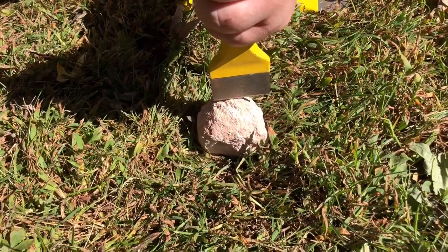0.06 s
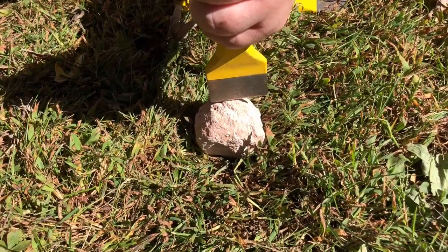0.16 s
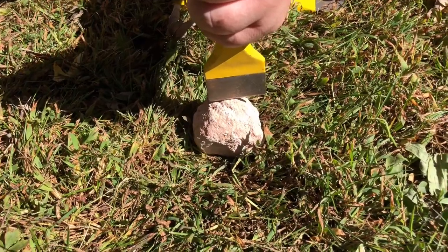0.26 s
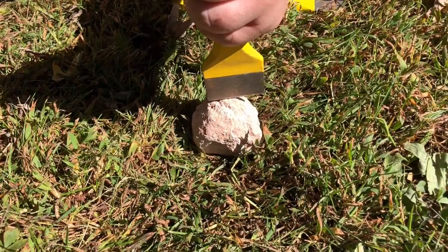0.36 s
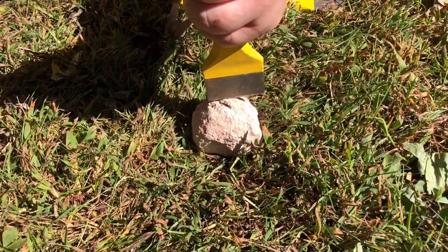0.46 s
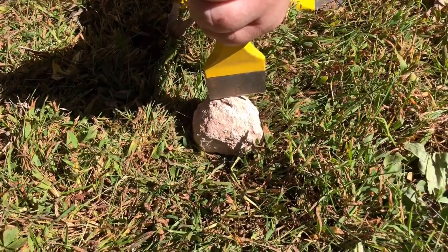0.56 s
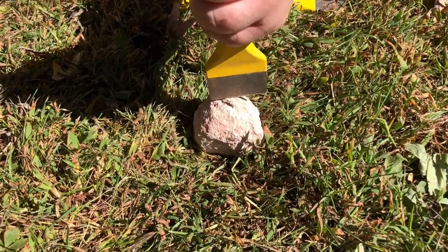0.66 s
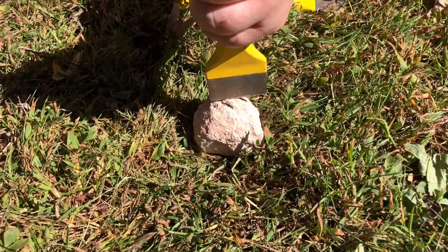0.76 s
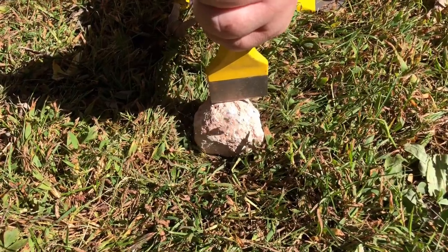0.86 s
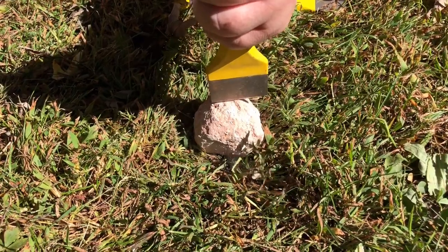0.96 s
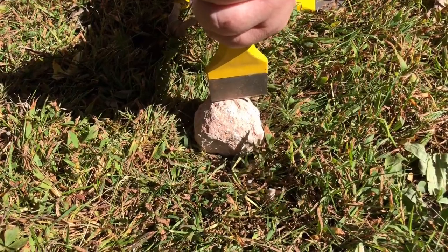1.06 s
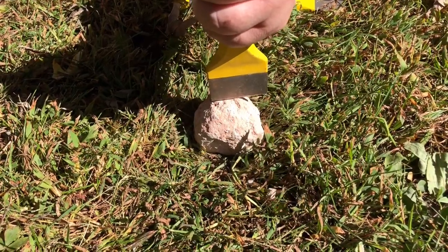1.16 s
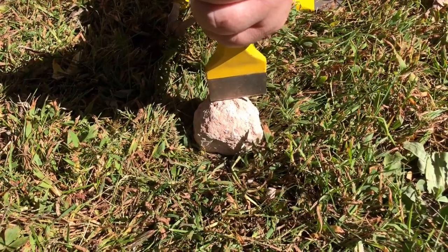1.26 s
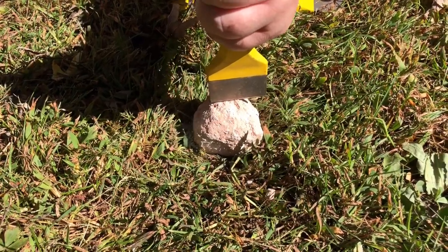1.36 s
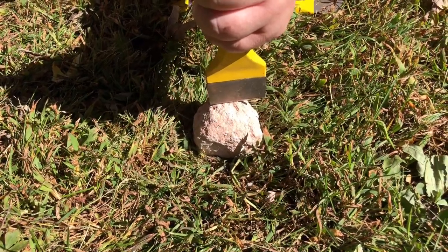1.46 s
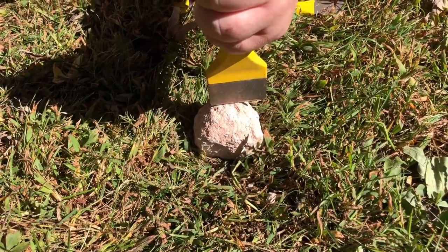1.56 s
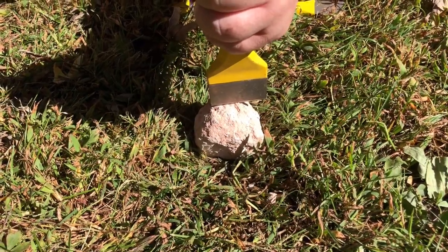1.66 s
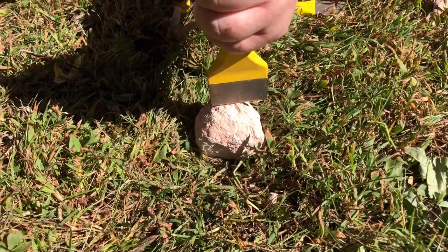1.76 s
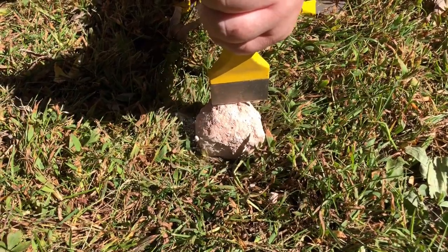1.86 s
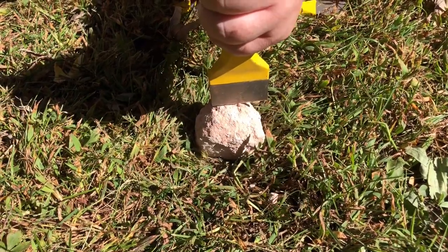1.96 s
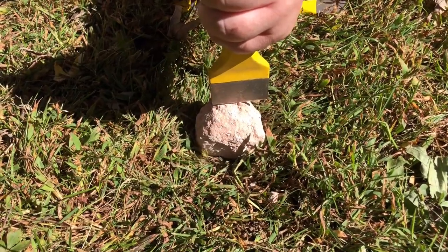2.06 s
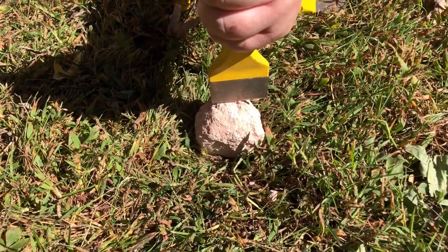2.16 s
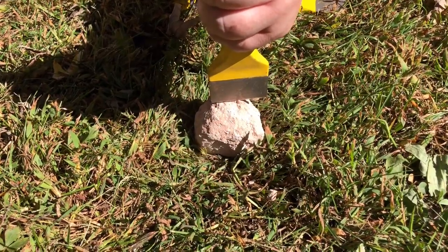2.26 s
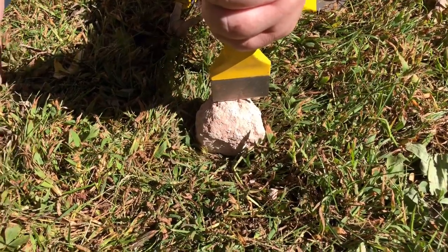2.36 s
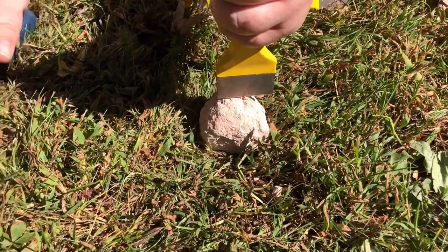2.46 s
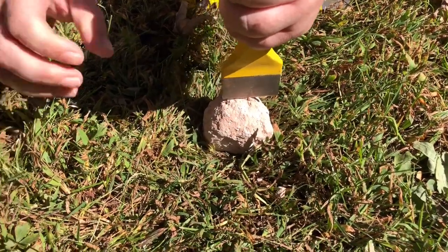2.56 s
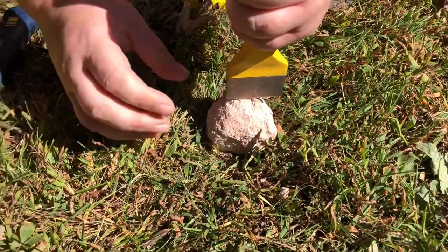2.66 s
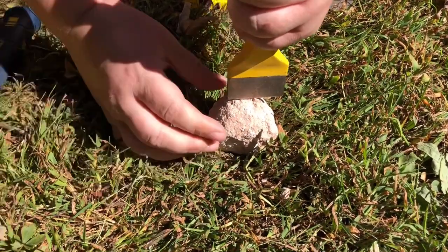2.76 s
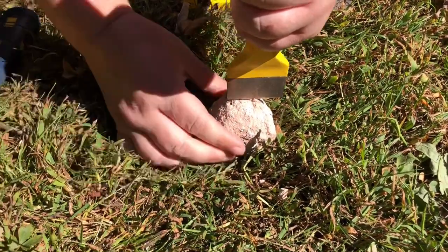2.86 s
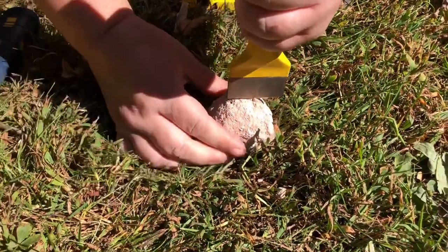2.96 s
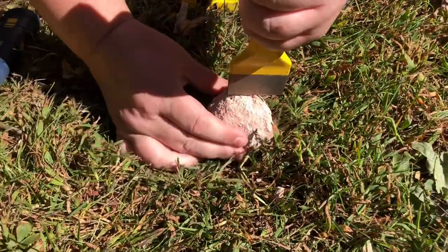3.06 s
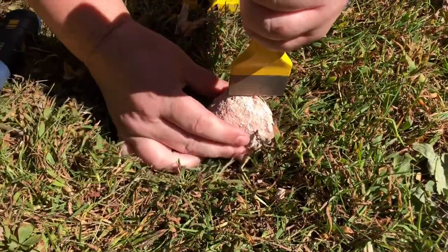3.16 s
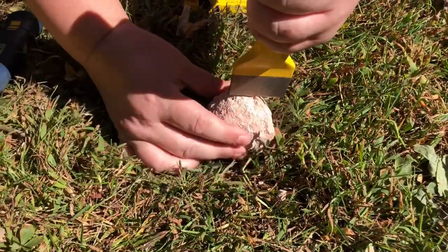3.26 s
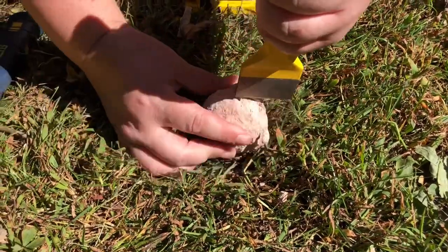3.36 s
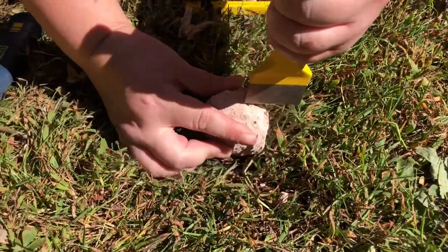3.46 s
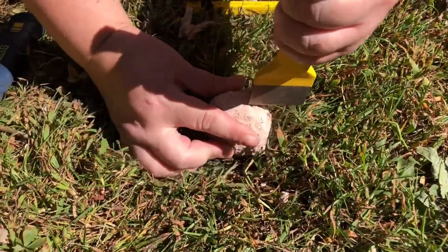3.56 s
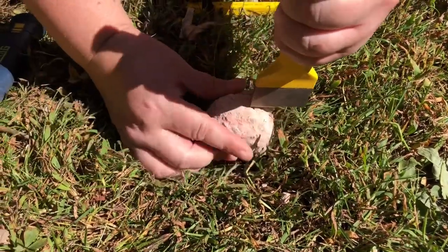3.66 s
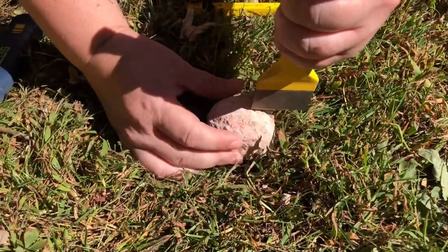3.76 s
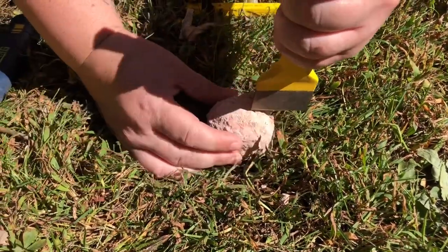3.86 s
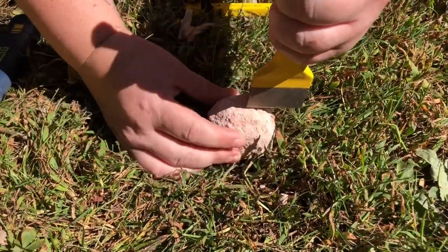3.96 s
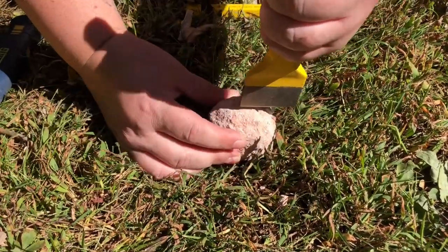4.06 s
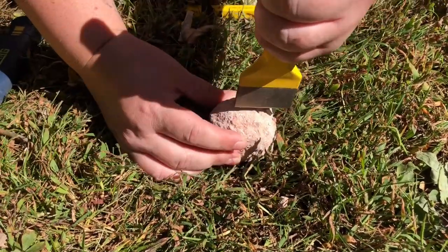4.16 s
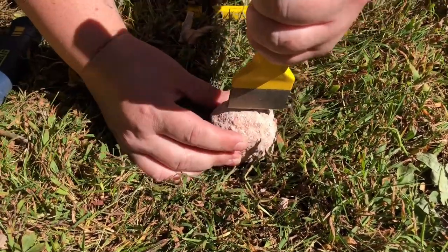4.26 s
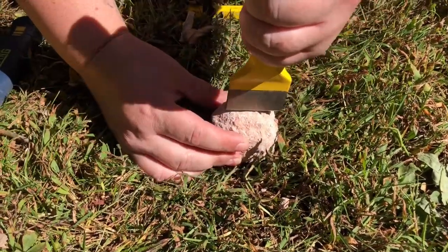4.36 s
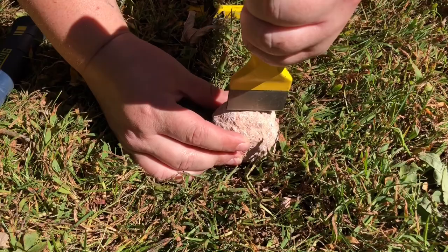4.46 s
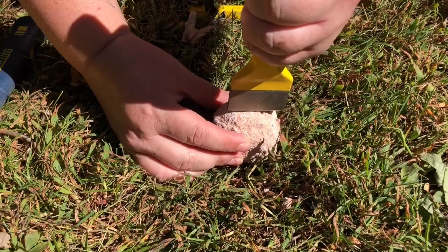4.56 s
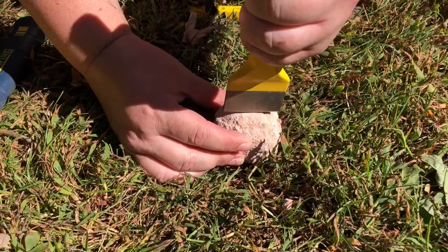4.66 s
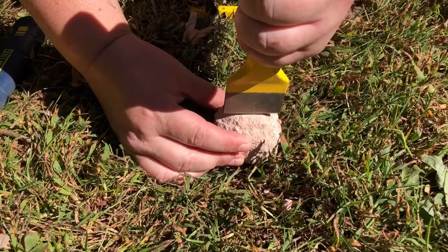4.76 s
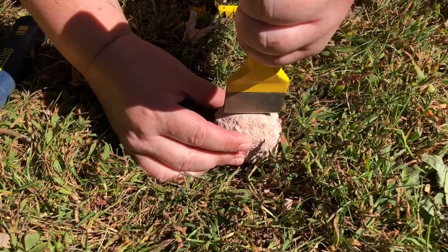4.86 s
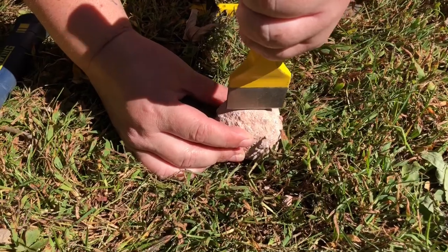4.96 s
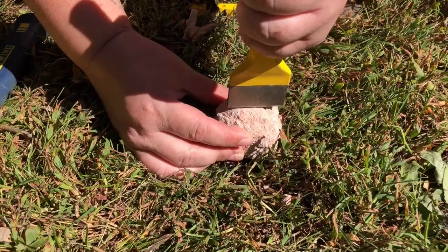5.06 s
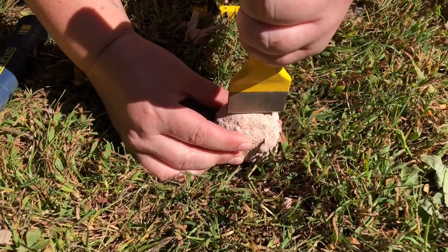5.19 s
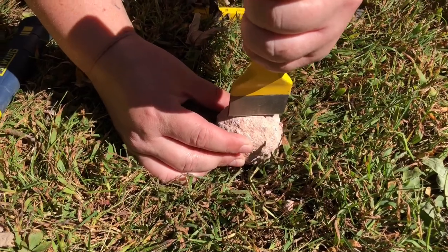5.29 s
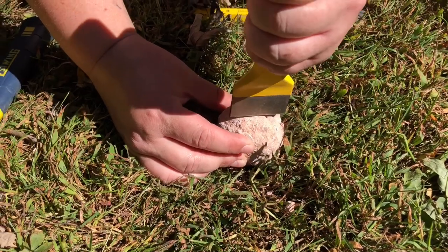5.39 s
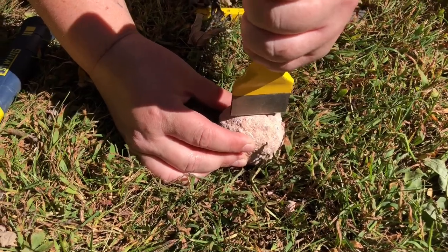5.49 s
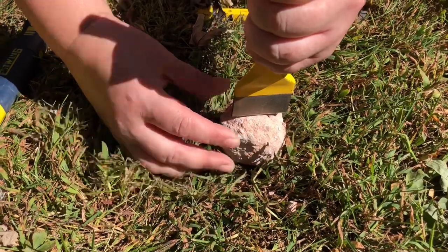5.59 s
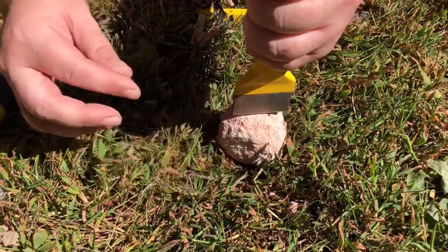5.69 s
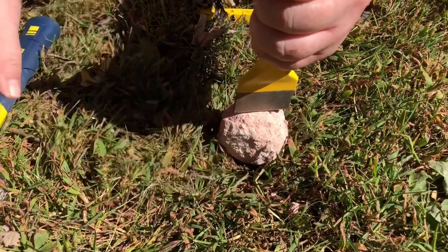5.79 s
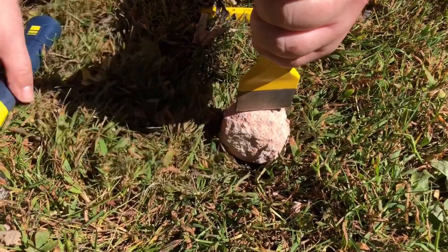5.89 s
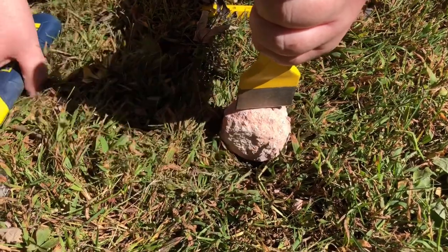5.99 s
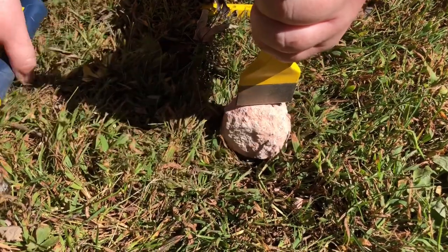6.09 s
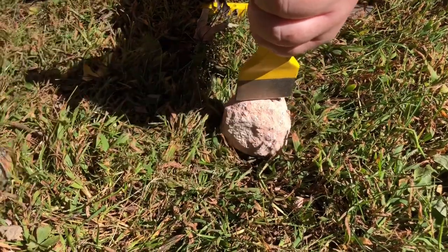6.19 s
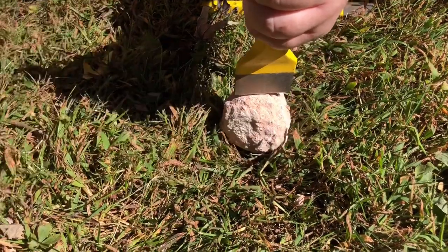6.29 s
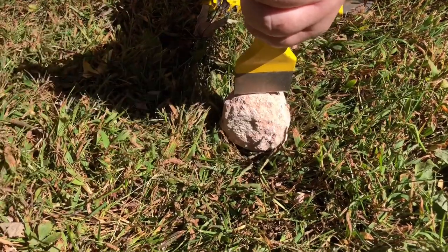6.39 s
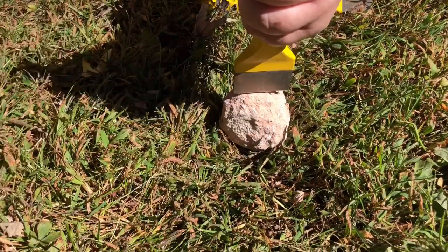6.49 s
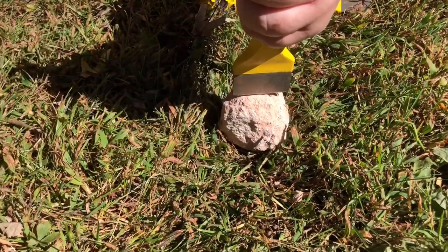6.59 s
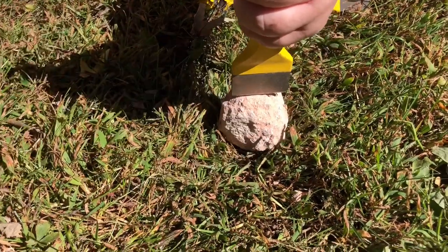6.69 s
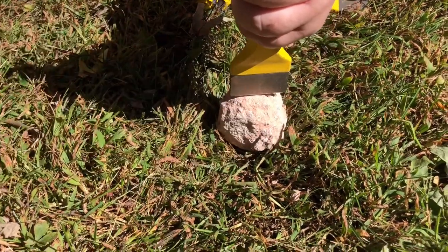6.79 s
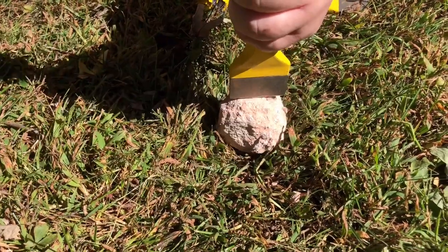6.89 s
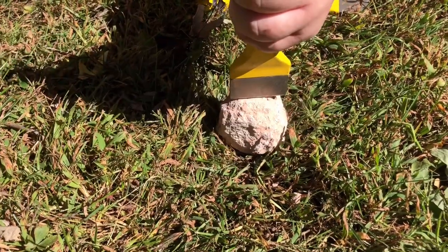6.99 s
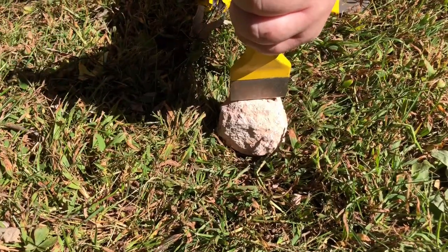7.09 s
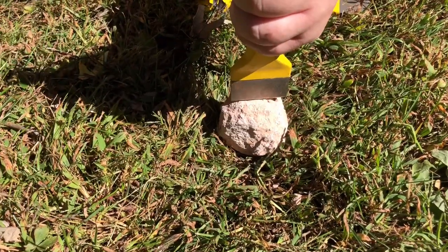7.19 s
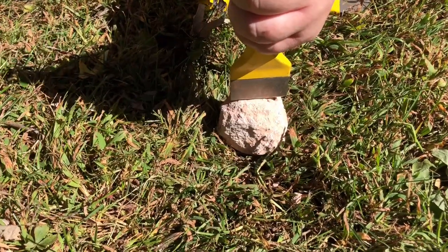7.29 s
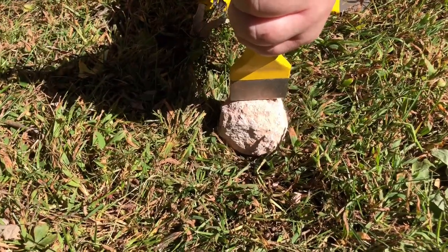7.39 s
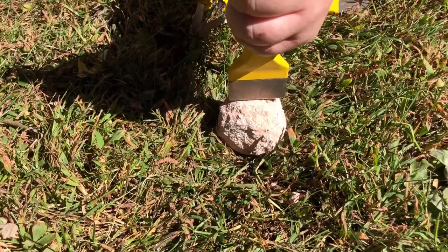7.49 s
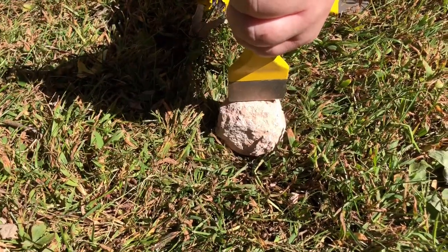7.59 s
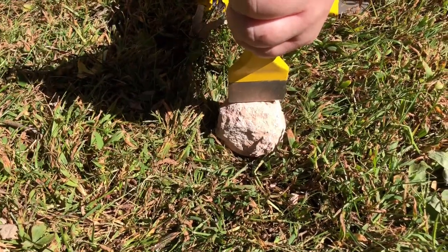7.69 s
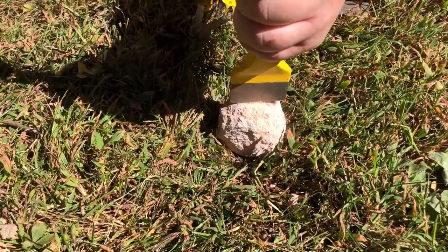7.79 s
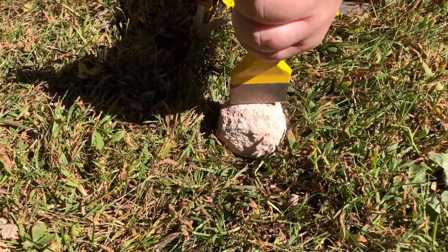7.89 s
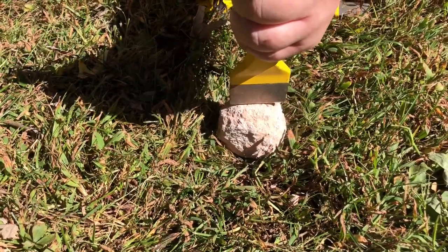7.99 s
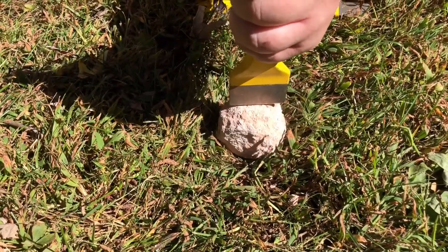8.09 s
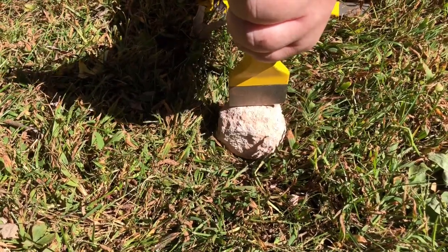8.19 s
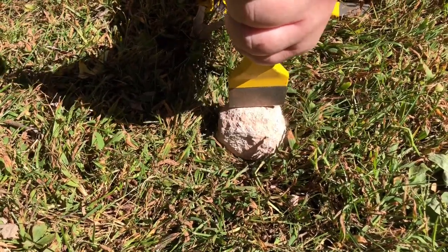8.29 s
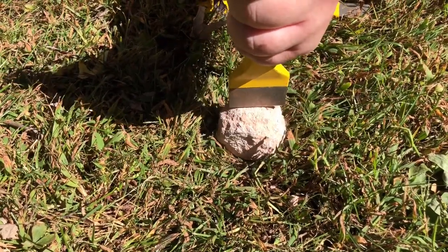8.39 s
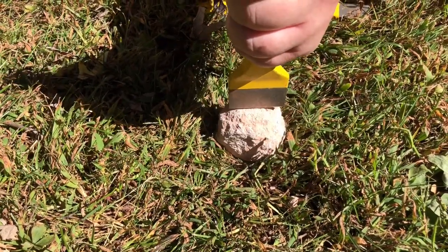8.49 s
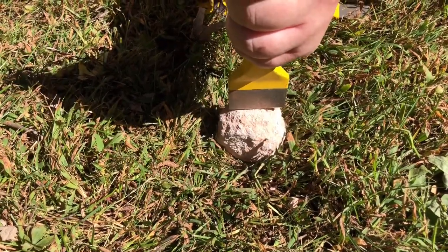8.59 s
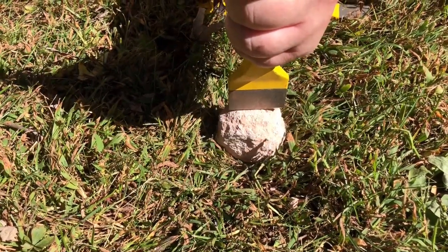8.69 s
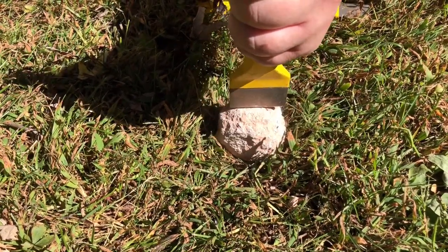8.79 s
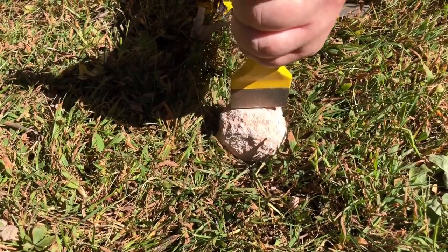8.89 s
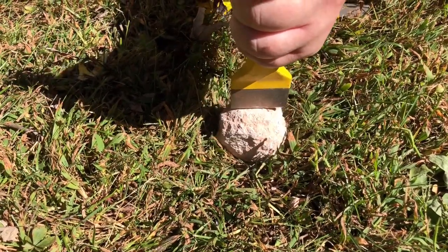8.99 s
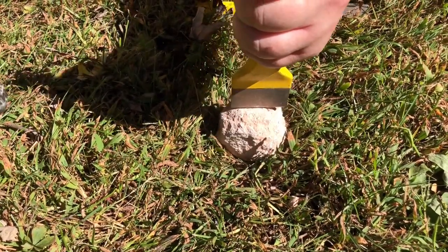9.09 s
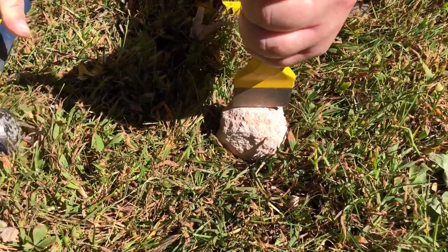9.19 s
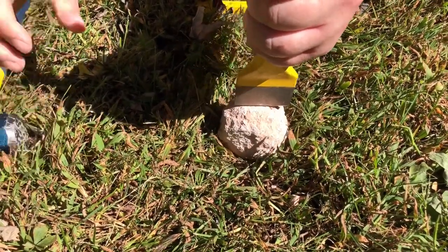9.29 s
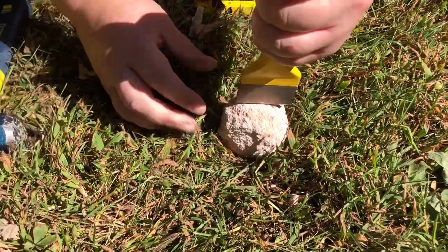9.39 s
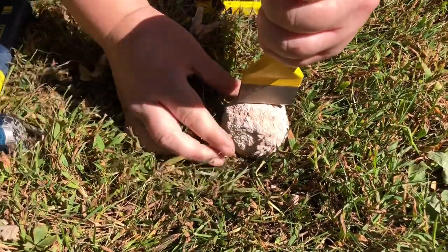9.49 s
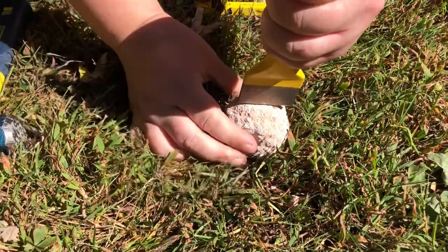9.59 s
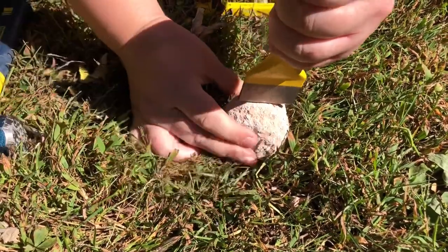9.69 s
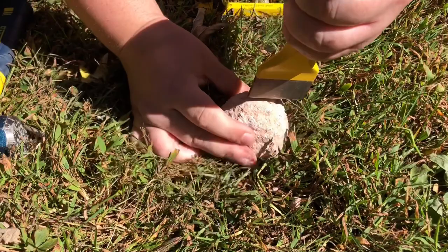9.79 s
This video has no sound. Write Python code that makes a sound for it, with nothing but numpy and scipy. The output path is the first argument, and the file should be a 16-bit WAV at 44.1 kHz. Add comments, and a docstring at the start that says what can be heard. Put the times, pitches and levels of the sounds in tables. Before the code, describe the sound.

A mallet hits a chisel on a stone in two runs of five sharp, ringing cracks, outdoors in a light breeze.

```python
"""A sharp crack, a thin steel ring, a thud of turf: a mallet drives a wide chisel against a geode
on a lawn, two runs of five blows. Between runs the stone is reset: the blade clinks on it, grit
snaps, clothing rustles. At the end the mallet drops on the grass. A nearby wall answers each blow.
Underneath: light breeze, far engine, high hiss. A limiter ducks briefly on the cracks."""
import sys
import numpy as np
from scipy import signal
from scipy.fft import rfft, irfft, next_fast_len
from scipy.io import wavfile
from scipy.ndimage import uniform_filter1d, minimum_filter1d

SR = 44100
rng = np.random.default_rng(int(sys.argv[2]) if len(sys.argv) > 2 else 0)


def digitize_waveform(pressure):
    """Quantize a signal to 16-bit integers and store it at the path in sys.argv[1].

    Rows of a 2-D input are taken as channels; values are limited to [-1, 1].
    """
    field = np.atleast_2d(pressure).T
    bounded = np.clip(field, -1, 1)
    quanta = np.round(bounded * 32767).astype(np.int16)
    wavfile.write(sys.argv[1], SR, quanta)


N = 434374
TIME_S = np.arange(N) / SR
EVENT_S = np.arange(int(.3 * SR)) / SR   # time axis of one impact

# breeze on the microphone: t/s, level/dB
BREEZE_LEVEL = [(0, -45.5), (.85, -48.5), (1.75, -52.5), (3.15, -48.5), (3.75, -51), (4.6, -48), (6.7, -48),
                (7.35, -45), (7.65, -50.5), (8.26, -53.5), (9.85, -48)]
# airy rush and high hiss together: t/s, level/dB
DISTANT_LEVEL = [(0, -59), (.8, -58.5), (1.7, -63), (3.05, -60), (7.35, -58), (7.6, -60), (8.26, -64),
                 (8.55, -62.5), (9.2, -64), (9.5, -59.5)]
# noise spectra: f/Hz, relative density/dB
BREEZE_SPECTRUM = [(20, -41), (40, -15), (65, -2.5), (100, 0), (135, -0.5), (200, -8.5), (320, -15),
                   (500, -21.5), (900, -50), (3000, -77.5)]
AIR_SPECTRUM = [(100, -11), (500, -0.5), (1200, 0.5), (2300, -2.5), (4000, -6), (7000, -5.5), (10000, -20),
                (15500, -20)]
HISS_SPECTRUM = [(4500, -39.5), (5650, -13.5), (6000, 6), (6700, 7), (7400, 1.5), (8000, 0.5), (8700, -15),
                 (10500, -33)]
CLOTH_SPECTRUM = [(400, 2.5), (1500, -2), (4000, 3), (7000, -1.5), (10000, 4.5), (13000, 4.5), (15700, 4.5)]
ECHO_SPECTRUM = [(100, 6), (900, -3), (1400, 0.5), (1850, 6), (2300, 1), (3000, 4.5), (4300, -4.5),
                 (5000, 2), (5400, 2), (5900, -4), (7000, -6), (10300, -2.5), (12500, -12), (15000, -1)]
# far engine, revving up twice: t/s, f/Hz, level/dB
ENGINE_TRACK = [(0, 97, -54), (1.4, 134.3, -60.5), (3.1, 133.2, -61), (3.7, 119.9, -67),
                (4.899, 112.3, -51.5), (5.599, 82.03, -58.5), (6.3, 93, -50.5), (7.4, 127.1, -47.5),
                (8.3, 113.9, -62.5), (9.2, 94, -57), (9.85, 112.8, -47.5)]
# wall echo and tail: delay/s, relative level/dB
ECHO_ENVELOPE = [(.006, -16), (.02, -7.5), (.04, -17.5), (.042, -0.5), (.046, -4), (.049, -0.5),
                 (.056, -9.5), (.09, -13.5), (.13, -19), (.22, -30), (.45, -50)]
# clothing rubs as the arm moves: t/s, length/s, start level/dB, swell/dB
CLOTH_SWISHES = [(2.424, 0.03, -47.5, 3.5), (2.474, 0.14, -50, -6.5), (2.87, 0.36, -62, -10),
                 (3.467, .07, -62.5, 5), (5.734, .18, -57, -3.5), (6.022, .42, -55, 5.5),
                 (9.284, 0.011, -44, -1.5), (9.366, .015, -49.5, 0), (9.488, .02, -61, -2),
                 (9.565, .1, -58, 1.5), (9.699, .15, -63, -4)]
# loose blade skids on the stone: t/s, level/dB, contact/s
BLADE_SKIDS = [(3.214, -62.5, 0.0038), (3.504, -38.5, 0.06), (4.07, -56, .03), (4.747, -39.5, 0.044),
               (5.157, -38.5, 0.019), (6.039, -49, .06)]
# grit snaps under the edge: t/s, level/dB, f/Hz
GRIT_SNAPS = [(1.279, -33.5, 4740), (3.214, -37.5, 4500), (4.0186, -40, 2900), (4.753, -37, 3020),
              (5.16, -34, 3020), (7.225, -51.5, 11060), (9.773, -34.5, 4260), (9.842, -41, 3900)]
# mallet lands on the grass: t/s, level/dB
MALLET_DROPS = [(9.307, -20), (9.386, -24)]
# modes: f/Hz, level/dB, t60/s
LOOSE_BLADE_MODES = [(1855, -6, 0.044), (3746, 1.5, 0.06), (3960, -11, 0.022), (7080, -3, .04),
                     (8800, -14.5, 0.053), (11560, -9.5, 0.029), (12640, -29, 0.11), (13900, -12.5, .05)]
BITING_BLADE_MODES = [(5320, -2.5, 0.017), (5413, 3, 0.013), (5560, -5.5, .015), (7290, -6, 0.014),
                      (10140, -9, 0.012), (11700, -16.5, 0.0061)]   # edge held in the stone
SHANK_MODES = [(12770, 0, .016), (12677, -17, .09), (14680, -10, .015), (14574, -31, .1)]   # main ring, then overtone; each a brief and a lasting mode
TURF_MODES = [(87, -10.5, 0.097), (175.9, -24, 0.071), (383, -34.5, 0.096), (445.5, -32.5, 0.12)]   # bounce on the lawn
GEODE_MODES = [(970, -23.5, 0.019), (1510, -14.5, 0.014), (2680, -8.5, 0.01), (3125, -6, 0.0093),
               (3440, -13, 0.0045), (3910, -3.5, 0.0072), (4450, -7.5, 0.018)]
# crack of the stone: f/Hz, density/dB, t60/s
CRACK_SPECTRUM = [(150, -28.5, .035), (410, -15.5, 0.034), (620, -30, 0.02), (900, -0.5, 0.023),
                  (1220, -6, 0.023), (1570, -4, .018), (2740, -0.5, 0.018), (4500, 1, 0.012),
                  (6200, 3.5, 0.0088), (7440, -13, 0.019), (8700, -22, 0.014), (11700, -1, 0.0065),
                  (15500, -22, 0.018)]
# faint ticks ahead of each crack: lead/s, relative level/dB
PRE_TICKS = [(.0232, -46.5), (.012, -54)]
# mallet blows: t/s, crack/dB, rebound delay/s, rebound/dB, knock/dB, knock centre/Hz,
# blade/dB, shank/dB, shank overtone/dB, thud/dB
MALLET_BLOWS = [(0.043, -0.5, 0.0018, -4, 2.5, 4700, 5, 10.5, -11, -7.5),
                (0.5056, 1.5, 0.0037, -1, -1.5, 4700, 4.5, 4.5, -4.5, 0),
                (0.9765, 0.5, 0.0043, -4.5, 3, 4400, 5.5, 9, -14.5, -0.5),
                (1.4421, 0.5, 0.0034, -9, 12.5, 4280, 0, -3.5, 2.5, -2.5),
                (1.922, 1, 0.0038, -6.5, 15, 3900, 2, 1, -1.5, 0),
                (7.0556, -0.5, 0.0022, -3.5, 12.5, 3900, 3.5, 4, -1.5, -15),
                (7.4858, -1.5, .0035, -9, 12.5, 2790, 0.5, 5.5, -10, -3.5),
                (7.9436, -1.5, 0.003, -5.5, 1.5, 2690, 0.5, 5.5, -13.5, -3.5),
                (8.3935, -0.5, 0.002, -4.5, 7, 3097, -7.5, 10.5, 11, -0.5),
                (8.8369, -2.5, 0.0012, -5.5, 15.5, 3510, 1.5, -3, 2, 3)]


def from_db(db):
    """Decibels to gain."""
    return 10 ** (np.asarray(db) / 20)


def unit_rms(x):
    """Scale to rms 1."""
    return x / np.sqrt(np.mean(x ** 2) + 1e-20)


def at_hz(rows, hz, column=1):
    """Table column, interpolated over log frequency."""
    rows = np.array(rows)
    return np.interp(np.log(np.maximum(hz, 1)), np.log(rows[:, 0]), rows[:, column])


def gain_curve(rows, column=1):
    """Gain over time from a dB column."""
    rows = np.array(rows)
    return from_db(np.interp(TIME_S, rows[:, 0], rows[:, column]))


def noise(spectrum, size=N):
    """Coloured noise, rms 1."""
    n = next_fast_len(size)
    colour = from_db(at_hz(spectrum, np.arange(n // 2 + 1) * SR / n))
    return unit_rms(irfft(rfft(rng.standard_normal(n)) * colour, n)[:size])


def drift(rate_hz):
    """Random wander, rms 1."""
    knots = rng.standard_normal(int(N / SR * rate_hz) + 2)
    return unit_rms(np.interp(TIME_S * rate_hz, np.arange(len(knots)), knots))


def bandpass(x, low_hz, high_hz):
    """Butterworth band-pass."""
    sos = signal.butter(2, [low_hz, min(high_hz, .45 * SR)], "band", fs=SR, output="sos")
    return signal.sosfilt(sos, x)


def decay(t60_s):
    """Envelope, down 60 dB at t60_s."""
    return from_db(-60 * EVENT_S / t60_s)


def burst(t60_s, low_hz, high_hz):
    """Decaying noise in one band."""
    return bandpass(rng.standard_normal(len(EVENT_S)) * decay(t60_s), low_hz, high_hz)


def ring(modes, spread_db=0, detune=0):
    """Struck modes; level and pitch vary with the contact point."""
    return sum(from_db(db + spread_db * rng.normal()) * decay(t60_s)
               * np.sin(2 * np.pi * hz * (1 + detune * rng.normal()) * EVENT_S)
               for hz, db, t60_s in modes)


def add(out, start_s, sound):
    """Mix a sound in at start_s."""
    i = max(0, round(start_s * SR))
    out[i:i + len(sound)] += sound[:max(0, len(out) - i)]


def breeze(gain_db=.5, gust_db=1):
    """Lumpy wind rumble on the microphone."""
    return from_db(gain_db + gust_db * drift(22)) * gain_curve(BREEZE_LEVEL) * noise(BREEZE_SPECTRUM)


def distant_hiss(air_db=2.5):
    """Airy rush and a high hiss as of far insects."""
    return gain_curve(DISTANT_LEVEL) * (from_db(air_db) * noise(AIR_SPECTRUM) + noise(HISS_SPECTRUM))


def far_whine(level_db=-71, fade_start_s=3.8, fade_db_per_s=29.5):
    """Faint narrow-band tone that dies away."""
    fade_db = fade_db_per_s * np.maximum(TIME_S - fade_start_s, 0)
    return from_db(level_db - fade_db) * unit_rms(bandpass(rng.standard_normal(N), 1300, 1328))


def far_engine(waver=0.01568, fade_db=3, harmonics_db=(0, -6, -18)):
    """Three low harmonics, each fading in and out through moving air."""
    times_s, hz, _ = np.transpose(ENGINE_TRACK)
    pitch_hz = np.interp(TIME_S, times_s, hz) * (1 + waver * drift(12))
    phase = 2 * np.pi * np.cumsum(pitch_hz) / SR
    hum = sum(from_db(db + fade_db * drift(9)) * np.sin(k * phase)
              for k, db in enumerate(harmonics_db, 1))
    return gain_curve(ENGINE_TRACK, column=2) * hum


def wall_echo(x, wet_db=-39):
    """Scattered reflection off the wall, then a short thin tail."""
    size = SR // 2
    arrived = TIME_S[:size] > ECHO_ENVELOPE[0][0]
    response = noise(ECHO_SPECTRUM, size) * gain_curve(ECHO_ENVELOPE)[:size] * arrived
    return from_db(wet_db) * signal.fftconvolve(x, response / np.linalg.norm(response))[:N]


def clothing(gain_db=3, uneven_db=2, grain_db=1.5, crackle_db=2, rise_db_per_s=600, fall_db_per_s=330):
    """Sliding fabric: bright uneven swishes with a fine crackle of fibres."""
    motion = 0
    for start_s, length_s, db, swell_db in CLOTH_SWISHES:
        age_s = TIME_S - start_s
        hold_db = db + swell_db * np.clip(age_s / length_s, 0, 1)
        fade_db = rise_db_per_s * np.maximum(-age_s, 0) + fall_db_per_s * np.maximum(age_s - length_s, 0)
        motion = np.maximum(motion, from_db(hold_db - fade_db))
    texture_db = uneven_db * drift(30) + grain_db * drift(150) + crackle_db * drift(2000)
    return from_db(gain_db + texture_db) * motion * noise(CLOTH_SPECTRUM)


def blade_clinks():
    """Skids on the stone drive the loose blade's bending modes."""
    out = np.zeros(N)
    for start_s, db, contact_s in BLADE_SKIDS:
        skid = rng.standard_normal(len(EVENT_S)) * np.exp(-(EVENT_S / contact_s) ** 4)
        clink = signal.fftconvolve(skid / np.linalg.norm(skid), ring(LOOSE_BLADE_MODES, spread_db=4))
        add(out, start_s, from_db(db) * clink)
    return out


def grit(t60_s=0.019, band_ratio=1.9):
    """Grains snap under the edge."""
    out = np.zeros(N)
    for start_s, db, hz in GRIT_SNAPS:
        add(out, start_s, from_db(db) * burst(t60_s, hz / band_ratio, hz * band_ratio))
    return out


def mallet_drop():
    """The dropped mallet thuds twice on the turf."""
    out = np.zeros(N)
    for start_s, db in MALLET_DROPS:
        add(out, start_s, from_db(db) * ring(TURF_MODES))
    return out


def stone_crack():
    """Stone crushed under the edge: a burst whose treble dies first."""
    out, edges_hz = 0, np.geomspace(120, 17000, 18)
    for low_hz, high_hz in zip(edges_hz, edges_hz[1:]):
        hz = np.sqrt(low_hz * high_hz)
        t60_s = at_hz(CRACK_SPECTRUM, hz, column=2)
        band = burst(t60_s, low_hz, high_hz)
        energy = t60_s * (high_hz - low_hz)   # wider and longer bands carry more
        out += from_db(at_hz(CRACK_SPECTRUM, hz)) * np.sqrt(energy) * band / np.linalg.norm(band)
    return out


def stone_knock(centre_hz, fall_db_per_octave=16):
    """Dry knock of the geode; edge position favours the modes near centre_hz."""
    modes = [(hz, db - fall_db_per_octave * abs(np.log2(hz / centre_hz)), t60_s)
             for hz, db, t60_s in GEODE_MODES]
    return ring(modes, spread_db=1, detune=0.024)


def edge_strike(crack_db, knock_db, knock_hz, blade_db, rise_s=0.00044):
    """One contact of edge and stone; force builds as the edge sinks in."""
    crack = from_db(crack_db) * stone_crack()
    knock = from_db(knock_db) * stone_knock(knock_hz)
    blade = from_db(blade_db) * ring(BITING_BLADE_MODES, spread_db=1, detune=.003)
    return (1 - np.exp(-EVENT_S / rise_s)) * (crack + knock + blade)


def mallet_blows(crack_gain_db=7, knock_gain_db=5, blade_gain_db=6, thud_lag_s=.0048, sink_s=.003):
    """The mallet hits, the chisel rings and rebounds onto the stone, the stone sinks into the turf."""
    out = np.zeros(N)
    for (start_s, crack_db, rebound_s, rebound_db, knock_db, knock_hz,
         blade_db, shank_db, overtone_db, thud_db) in MALLET_BLOWS:
        contact = (crack_db + crack_gain_db, knock_db + knock_gain_db, knock_hz, blade_db + blade_gain_db)
        strike = edge_strike(*contact)
        add(out, start_s, strike)
        add(out, start_s + rebound_s, from_db(rebound_db) * edge_strike(*contact))
        add(out, start_s, from_db(shank_db) * ring(SHANK_MODES[:2], detune=0.00071))
        add(out, start_s, from_db(overtone_db) * ring(SHANK_MODES[2:], detune=0.00097))
        thud = (1 - np.exp(-EVENT_S / sink_s)) * ring(TURF_MODES, detune=.012)
        add(out, start_s + thud_lag_s, from_db(thud_db) * thud)
        for lead_s, db in PRE_TICKS:
            add(out, start_s - lead_s, from_db(db) * strike)
    return out


def scene():
    """Tools and stone close by, the yard around them; mono."""
    work = mallet_blows() + blade_clinks() + grit() + mallet_drop()
    near = work + wall_echo(work) + clothing()
    background = breeze() + distant_hiss() + far_whine() + far_engine()
    return (near + background)[None]


def limiter(x, ceiling_db=2, hold_s=0.01, release_db_per_s=2200):
    """Gain drops just ahead of a peak, holds, recovers fast."""
    over_db = np.maximum(20 * np.log10(np.abs(x) + 1e-9) - ceiling_db, 0)
    hold = max(2, int(hold_s * SR))
    held_db = -minimum_filter1d(-over_db, hold, origin=(hold - 1) // 2)
    ramp_db = release_db_per_s * TIME_S
    cut_db = np.maximum.accumulate(held_db + ramp_db) - ramp_db
    ahead = SR // 1000   # 1 ms
    return x * from_db(-uniform_filter1d(np.roll(cut_db, -ahead), ahead))


def record(dry, cutoff_hz=15800):
    """Limiter, clipping of the tallest peaks, steep low-pass."""
    clipped = np.clip(limiter(dry[0]), -.95, .95)
    lowpass = signal.ellip(12, .1, 90, cutoff_hz, fs=SR, output="sos")
    return signal.sosfilt(lowpass, clipped)[None]


dry = scene()
out = record(dry)
digitize_waveform(out)
```